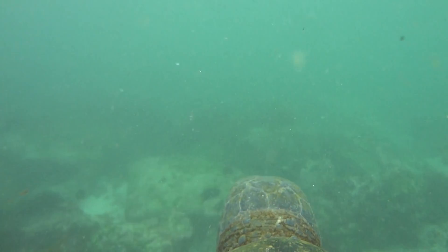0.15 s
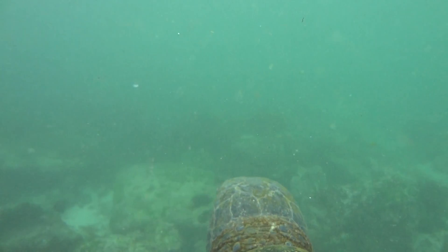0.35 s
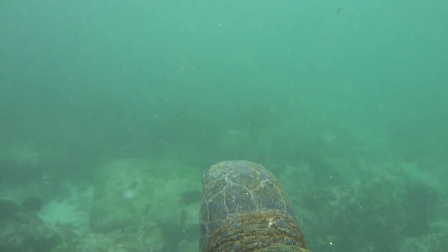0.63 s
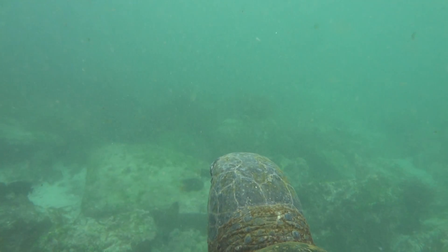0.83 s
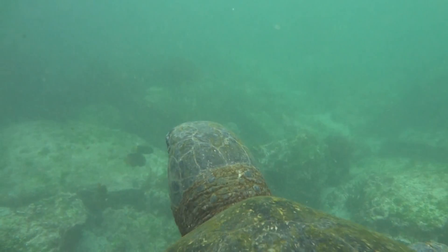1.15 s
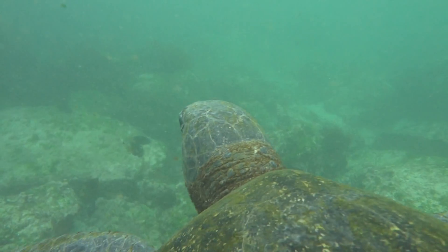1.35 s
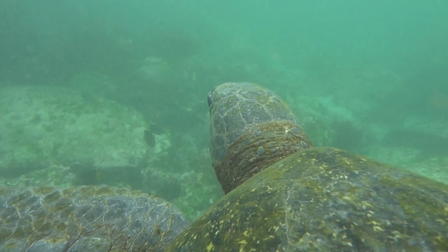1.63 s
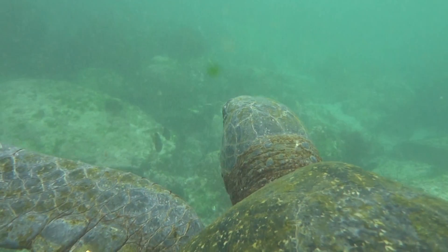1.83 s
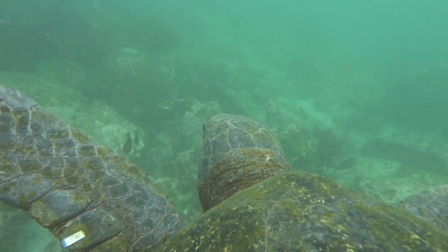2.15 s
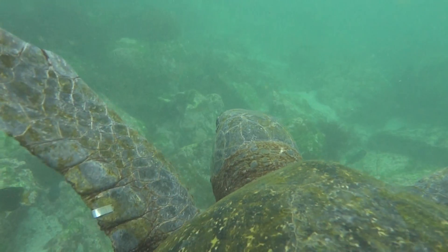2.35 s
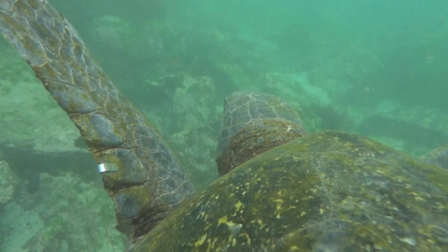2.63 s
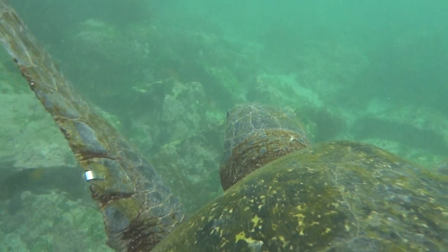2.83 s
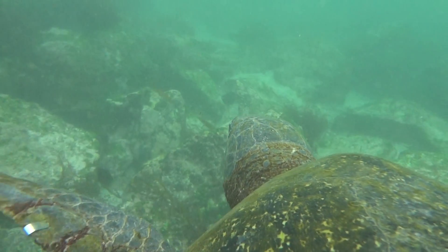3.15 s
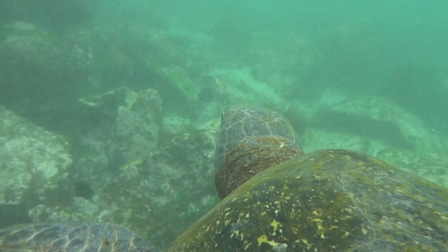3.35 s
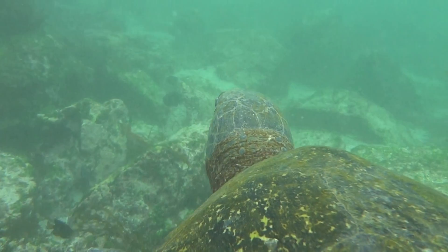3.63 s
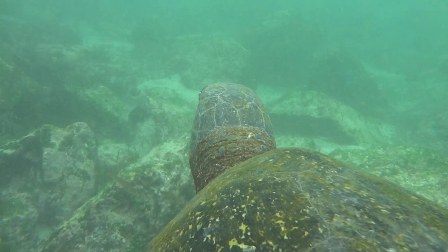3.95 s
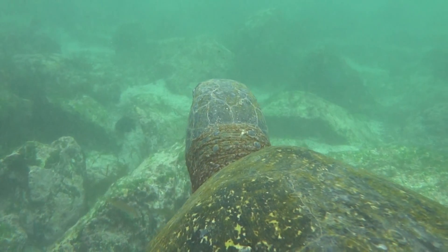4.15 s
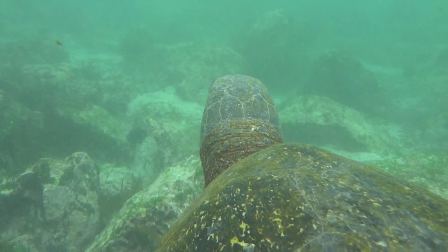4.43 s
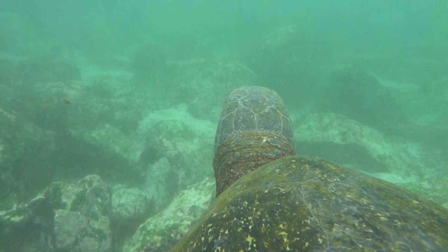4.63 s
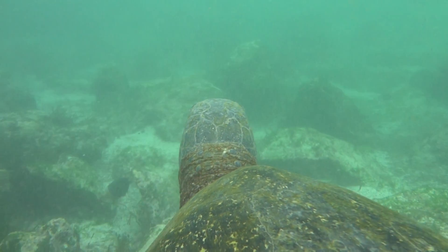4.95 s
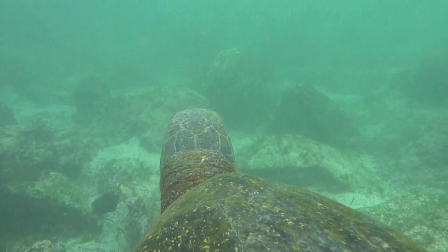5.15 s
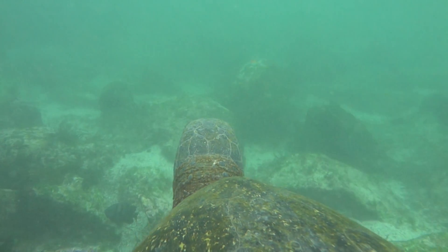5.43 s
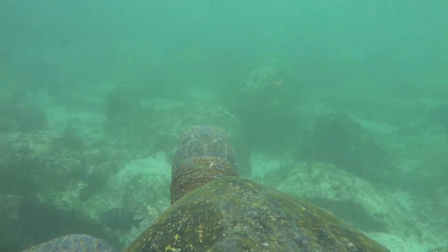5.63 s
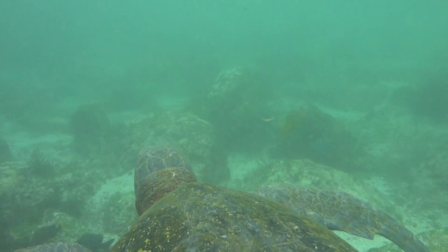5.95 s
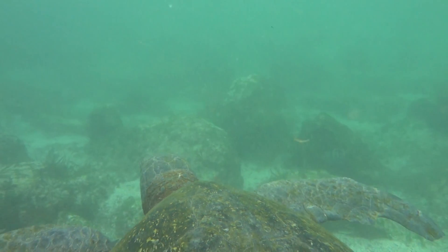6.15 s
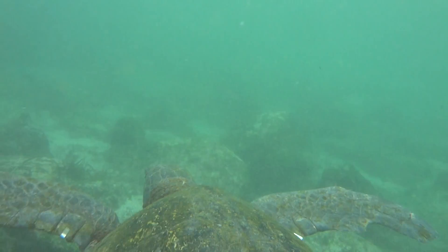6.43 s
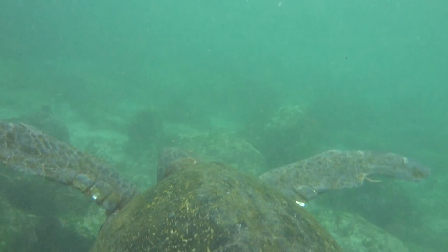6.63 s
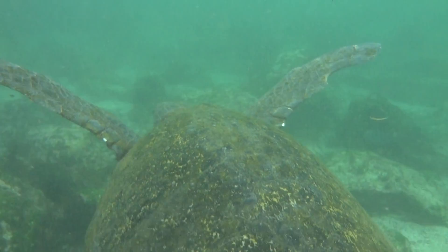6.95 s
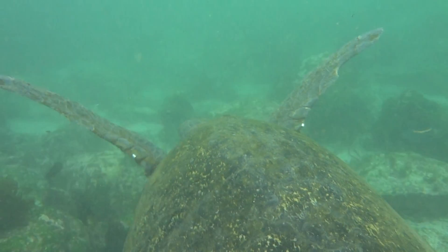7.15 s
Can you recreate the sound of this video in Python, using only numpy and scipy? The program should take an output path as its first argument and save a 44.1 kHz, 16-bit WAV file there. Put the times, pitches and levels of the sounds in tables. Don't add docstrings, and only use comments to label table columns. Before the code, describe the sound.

Underwater over a rocky reef, a sealed camera follows a swimming turtle. From 0 s a calm bed of low rumble and slosh carries continuous fine shrimp crackle, with sharp irregular snaps close by and brief bubble pings; small air pockets gulp in the first second. Around 1.4 s water surges past, deeper and fizzier, with dull thuds on the case. At about 2.2 s the loudest gulp, a low wavering tone that sinks slightly then glides upward, makes the crackle duck and recover. The flow calms after 2.6 s; hard knocks land near 2.8 s, another gulp rises at 3 s, and thuds cluster from 3.8 to 4.6 s and near 5.4 s. Snaps continue, some strong around 5.8 and 6.1 s. Rumble gradually swells, and low gulps at 6.9 to 7.1 s lead into a heavy closing surge. The plastic shell colours everything boxy, in narrow stereo with a very faint high whine.

```python
import sys
import numpy as np
from scipy import signal
from scipy.fft import rfft, irfft
from scipy.io import wavfile
from scipy.ndimage import uniform_filter1d

SR = 44100
rng = np.random.default_rng(int(sys.argv[2]) if len(sys.argv) > 2 else 0)


def to_wav(s):
    ch = np.atleast_2d(s).T
    pcm = np.round(np.clip(ch, -1, 1) * 32767)
    wavfile.write(sys.argv[1], SR, pcm.astype(np.int16))


def nominal_scale(level):
    x = np.asarray(level, float) / 20
    return 10 ** x


N = 321930


def evened(x):
    return x / np.sqrt(np.mean(x ** 2) + 1e-20)


def read(points, hz):
    point_hz, value = np.transpose(points)
    return np.interp(np.log(hz + 1), np.log(point_hz + 1), value)


def add(mix, start_s, sound):
    part = mix[..., max(round(start_s * SR), 0):][..., :sound.shape[-1]]
    part += sound[..., :part.shape[-1]]


def flow(column):
    # start_s, rumble_db, slosh_db, fizz_db, far_crackle_db, bass_left_right_db
    flow_rows = [
        (0.0, -35, -36, -46, -49.5, -2.5),
        (1.36, -24, -33, -38.5, -49, -6.5),
        (2.58, -36.5, -34.5, -49, -52, -2.5),
        (5.59, -31.5, -38, -50.5, -50, -2.5),
        (7.3, -21.5, -34.5, -48.5, -50, -7.5),
    ]
    names = ["start_s", "rumble_db", "slosh_db", "fizz_db", "far_crackle_db", "bass_left_right_db"]
    rows = np.array(flow_rows)
    return np.interp(np.arange(N) / SR, rows[:, 0], rows[:, names.index(column)])


def lumpy(spectrum, lump_db, lump_s):
    hz = np.fft.rfftfreq(N, 1 / SR)
    white = rng.standard_normal((2, N))
    noise = irfft(rfft(white) * nominal_scale(read(spectrum, hz)), N)
    lumps = rfft(rng.standard_normal(N)) * np.exp(-(hz * lump_s) ** 2)
    swell_db = lump_db * evened(irfft(lumps, N))
    return evened(noise * nominal_scale(swell_db))


def grains(per_s, spread_db, tail_s, hiss):
    size_db = spread_db * np.minimum(rng.exponential(1, N), 3.5)
    size = nominal_scale(size_db) * (rng.random(N) < per_s / SR)
    power = signal.lfilter([1], [1, -np.exp(-1 / (tail_s * SR))], size ** 2)
    return evened(np.sqrt(power / power.mean() + hiss) * rng.standard_normal((2, N)))


def shell(x, lo_hz, hi_hz):
    # pitch_hz, width_hz, level_db
    modes = [(974, 580, 2), (1218, 680, -2.5), (1650, 307, 1), (2317, 870, -7.5), (3380, 930, -3),
             (3720, 330, -2.5), (4650, 600, -15), (5800, 690, -18), (7080, 1870, -16),
             (8510, 183, -9.5), (8915, 1560, -16),
             (10400, 450, -23), (11400, 700, -24), (12250, 400, -26), (13900, 900, -33),
                 (14750, 600, -17), (15550, 450, -22)]
    hz = abs(np.fft.fftfreq(4096, 1 / SR))
    power = 0
    for pitch_hz, width_hz, level_db in modes:
        power = power + nominal_scale(2 * level_db) / (1 + (2 * (hz - pitch_hz) / width_hz) ** 2) ** 2
    power = power / (1 + (lo_hz / (hz + 1)) ** 8) / (1 + (hz / hi_hz) ** 8)
    log_gain = np.log(power + 1e-10) / 2
    phase = -signal.hilbert(log_gain).imag
    ring = np.fft.ifft(np.exp(log_gain + 1j * phase)).real[:2048]
    return signal.oaconvolve(x, ring[None] / np.linalg.norm(ring), axes=1)[:, :N]


def whine():
    # pitch_hz, level_db
    tones = [(15625, -72)]
    t = np.arange(N) / SR
    return sum(np.sqrt(2) * nominal_scale(level_db) * np.sin(2 * np.pi * hz * t) for hz, level_db in tones)


def water():
    # pitch_hz, density_db (per Hz)
    rumble_curve = [(2, -17.5), (4, -1.5), (21, 10), (50, -2.5), (80, -7), (150, -52), (300, -120)]
    # pitch_hz, density_db (per Hz)
    slosh_curve = [(29, -5), (50, -2), (136, -3), (339, -16.5), (539, -21), (800, -29.5), (1040, -57),
                   (1760, -120)]
    rumble = nominal_scale(flow("rumble_db")) * lumpy(rumble_curve, lump_db=3.3, lump_s=.15)
    slosh = nominal_scale(flow("slosh_db") + 2.5) * lumpy(slosh_curve, lump_db=2.4, lump_s=.03)
    return rumble + slosh


def crackle():
    fizz = shell(grains(per_s=170, spread_db=10.5, tail_s=0.0071, hiss=0.31), 550, 2220)
    far = shell(grains(per_s=220, spread_db=5.0, tail_s=0.0015, hiss=0.22), 2920, 4350)
    fine = nominal_scale(-2.5) * shell(grains(per_s=260, spread_db=7.0, tail_s=0.0021, hiss=0.4), 6030, SR / 2)
    duck_s, duck_db, recover_s = 2.222, -13, .25
    since_s = np.arange(N) / SR - duck_s
    dip = nominal_scale(duck_db * np.exp(-abs(since_s) / recover_s) * (since_s > 0))
    return dip * (nominal_scale(flow("fizz_db") + 3.5) * fizz + nominal_scale(flow("far_crackle_db") - 2.0) * (far + fine))


def snaps():
    # start_s, low_db, middle_db, high_db
    snap_rows = [(0.1029, -52, -35, -40), (0.1237, -56, -56, -40), (0.1529, -24.5, -29, -38),
                 (0.182, -42, -32, -50), (0.3025, -15.5, -30.5, -32), (0.3438, -20, -20.5, -30),
                 (0.4458, -58, -32, -48), (0.4907, -55, -43, -57), (0.55, -22.5, -18, -28),
                 (0.696, -54, -24.5, -43), (0.8073, -38, -25.5, -24.5), (0.849, -47, -44, -34),
                 (0.9858, -17, -26.5, -28), (1.001, -21, -25.5, -31.5), (1.22, -19, -39, -49),
                 (1.3718, -25.5, -28, -34), (1.4024, -28, -20, -41), (1.4426, -32, -30, -33),
                 (1.5198, -46, -36, -40), (1.551, -26.5, -19.5, -32.5), (1.5936, -30, -40, -36),
                 (1.6196, -41, -57, -41), (1.7572, -28, -32, -38), (1.7754, -36, -33, -35.5),
                 (1.7966, -36, -27, -37), (1.8307, -44, -35, -38), (1.978, -39, -24, -32),
                 (2.0279, -24, -26, -37.5), (2.096, -30, -26.5, -33.5), (2.1876, -12, -30.5, -32),
                 (2.3936, -22.5, -27.5, -38), (2.526, -37, -56, -51), (2.5466, -31, -34, -49),
                 (2.6831, -25, -40, -48), (2.7003, -28, -30.5, -40), (2.7833, -25.5, -34, -44),
                 (2.817, -75, -42, -41.5), (2.8522, -35, -53, -62), (2.8827, -58, -34.5, -38),
                 (2.984, -37, -47, -46.5), (3.0738, -30, -40, -42), (3.15, -27.5, -28.5, -38),
                 (3.1817, -18, -32.5, -41.5), (3.2143, -31, -51, -47), (3.275, -45, -57, -34.5),
                 (3.341, -29.5, -42, -44), (3.4099, -34, -45, -48), (3.4407, -35, -43, -43),
                 (3.4834, -47.5, -46, -45), (3.6291, -63, -62, -51), (3.7059, -51, -31, -37),
                 (3.779, -34, -33, -48), (3.8555, -39, -32, -53), (4.0723, -28, -38, -34),
                 (4.111, -27, -27.5, -32), (4.125, -36, -28, -32), (4.2084, -30.5, -51, -51),
                 (4.255, -49, -52, -32), (4.33, -17, -36, -36), (4.396, -35, -28.5, -52),
                 (4.5095, -43, -46, -34.5), (4.5473, -57, -43, -40), (4.658, -25, -29.5, -62),
                 (4.7587, -20, -31, -39), (4.7796, -50, -22, -24), (4.891, -32, -29, -34.5),
                 (4.9058, -30.5, -26, -41), (5.096, -31.5, -35, -51), (5.1325, -40, -54, -42),
                 (5.1518, -34, -56, -46), (5.2307, -37, -37, -32.5), (5.305, -28, -29, -40),
                 (5.367, -22, -36.5, -40), (5.418, -24.5, -27.5, -32), (5.4553, -56, -52, -38),
                 (5.4761, -54, -33.5, -43), (5.513, -27.5, -38, -52), (5.5443, -20.5, -36, -40),
                 (5.576, -31, -35, -45), (5.651, -30.5, -51, -46), (5.7431, -22.5, -26.5, -33.5),
                 (5.7987, -13, -24, -27.5), (5.8364, -28, -42, -42), (5.8609, -45, -30, -46),
                 (5.934, -36.5, -50, -38), (6.0012, -28.5, -50, -49), (6.0837, -18.5, -22, -30),
                 (6.105, -47, -41.5, -42.5), (6.157, -41, -30.5, -40), (6.2056, -32.5, -40, -43),
                 (6.296, -31, -50, -55), (6.3637, -41, -35.5, -69), (6.4789, -33, -45, -51),
                 (6.4931, -22, -41, -34.5), (6.589, -47, -48, -33), (6.6207, -33, -24, -44),
                 (6.6662, -27.5, -28, -39), (6.7606, -17.5, -32, -40), (6.8138, -29, -35, -38),
                 (6.8413, -48, -30, -37), (6.8777, -32, -45, -52), (6.9402, -28, -43, -52),
                 (7.0704, -27, -29, -25), (7.1003, -37, -31, -36), (7.1328, -52, -31, -52),
                 (7.2564, -42, -41, -37), (7.2698, -32, -29.5, -39), (7.2966, -27, -33, -46)]
    # low_hz, high_hz, t60_s
    bands = [(630, 1730, 0.036), (2124, 4030, 0.035), (4700, 14000, 0.027)]
    t, out = np.arange(2600) / SR, np.zeros((2, N))
    bursts = rng.standard_normal((len(snap_rows), 3, 2, len(t)))
    bursts[..., 4] = 4.7
    for k, (lo_hz, hi_hz, t60_s) in enumerate(bands):
        shape = nominal_scale(-60 * t / t60_s) + nominal_scale(-22.5 - 60 * t / 0.11)
        train = np.zeros((2, N))
        for row, burst in zip(snap_rows, bursts):
            level_db = row[1 + k] - 3.0
            add(train, row[0] - .0004, nominal_scale(level_db) * shape * burst[k])
        out += shell(train, lo_hz, hi_hz)
    return out


def pings():
    # start_s, peak_db, pitch_hz, t60_s
    ping_rows = [(0.303, -9.5, 1000, 0.053), (0.806, -11, 3790, 0.032), (1.221, -17, 880, 0.051),
                 (2.029, -14, 1784, 0.028), (2.393, -25, 1650, 0.056), (3.183, -7.5, 950, 0.03),
                 (4.329, -22, 1094, 0.046), (4.777, -19, 3810, 0.042), (5.543, -19.5, 1594, 0.055),
                 (6.0, -14, 796, 0.04), (6.506, -15, 890, 0.058), (6.939, -17.5, 1680, 0.031)]
    t, out = np.arange(4000) / SR, np.zeros((2, N))
    for start_s, peak_db, hz, t60_s in ping_rows:
        decay_db = -60 * t / np.clip(t60_s, .01, .1)
        shape = (1 - np.exp(-t / 0.00033)) * nominal_scale(peak_db - 5.5 + decay_db)
        add(out[0], start_s, shape * np.sin(2 * np.pi * hz * t * (1 + 3.9 * t)))
    return out


def thumps():
    # start_s, peak_db, pitch_hz, t60_s
    knocks = [(0.363, -28, 239, 0.07), (0.491, -27.5, 204, 0.11), (0.548, -15, 137, 0.042),
              (0.685, -28, 290, 0.078), (0.927, -29, 99, 0.03), (1.307, -25, 127.3, 0.2),
              (1.327, -13, 124, 0.07), (1.404, -20.5, 108, 0.2), (1.692, -22.5, 79, 0.05),
              (1.801, -22, 108, 0.13), (1.918, -18, 86, 0.044), (1.949, -22.5, 156, 0.041),
              (2.098, -24.5, 138, 0.078), (2.191, -15, 151, 0.058), (2.707, -23.5, 82.6, 0.059),
              (2.785, -10.5, 186, 0.03), (2.852, -9, 189, 0.032), (2.926, -23, 90, 0.09),
              (3.179, -23.5, 148, 0.054), (3.461, -25, 135, 0.1), (3.604, -23, 84, 0.078),
              (3.773, -19, 97, 0.066), (3.811, -19.5, 147, 0.047), (3.876, -12.5, 184, 0.038),
              (4.079, -21.5, 150, 0.061), (4.11, -20.5, 116, 0.051), (4.288, -30, 116, 0.09),
              (4.329, -10, 152, 0.065), (4.423, -17.5, 167, 0.045), (4.484, -11.5, 205, 0.046),
              (4.527, -19.5, 138, 0.04), (4.621, -15.5, 144.6, 0.058), (4.858, -17.5, 112, 0.069),
              (4.918, -28, 100, 0.1), (4.98, -22, 184, 0.053), (5.2, -29.5, 128, 0.062),
              (5.269, -44, 146, 0.061), (5.409, -19, 95.7, 0.03), (5.432, -9.5, 120, 0.08),
              (5.53, -28, 178, 0.11), (5.635, -28.5, 133, 0.13), (5.839, -14, 158, 0.03),
              (6.065, -20.5, 114.6, 0.071), (6.103, -16.5, 105, 0.063), (6.173, -23, 80.7, 0.077),
              (6.256, -14, 75, 0.03), (6.318, -22.5, 114.6, 0.062), (6.505, -28, 134.4, 0.14),
              (6.668, -24, 127, 0.13), (7.194, -33, 73.6, 0.15)]
    t, out = np.arange(6000) / SR, np.zeros(N)
    for start_s, peak_db, hz, t60_s in knocks:
        swell = 1 - np.exp(-(t * hz / 0.55) ** 2)
        shape = swell * nominal_scale(-60 * t / np.clip(t60_s, .02, .3))
        phase = 2 * np.pi * hz * (t + 0.0013 * (1 - np.exp(-t / 0.0019)))
        add(out, start_s + 0.00071, nominal_scale(peak_db + 3.5) * shape / shape.max() * np.sin(phase))
    return out


def gulps():
    # start_s, pitch_hz, level_db
    pockets = [
        [(0, 196, -19), (.02, 174, -21.5), (.04, 172, -41)],
        [(.368, 257, -25), (.4, 249, -29.5), (.44, 280, -43), (.47, 307, -36)],
        [(.625, 288, -49), (.64, 289, -29), (.67, 300, -32), (.69, 310, -20.5)],
        [(.897, 106, -16), (.91, 100.2, -24), (.95, 95.5, -17), (1, 99.5, -20), (1.04, 107, -42),
         (1.1, 115, -33), (1.2, 132.3, -16)],
        [(.96, 170, -32), (1, 174, -27), (1.04, 172, -50)],
        [(2.212, 93.5, -20), (2.23, 92.4, -16.5), (2.29, 95.85, -8.5), (2.34, 102.7, -16), (2.37, 108.7, -11),
         (2.44, 115.7, -13.5), (2.49, 122.2, -21), (2.53, 133, -36)],
        [(2.33, 189, -28.5), (2.36, 172.5, -21.5), (2.41, 170, -28), (2.47, 177, -34)],
        [(2.545, 167.3, -28.5), (2.565, 159, -16), (2.59, 151.7, -23.5), (2.62, 159.2, -23.5), (2.65, 165, -34)],
        [(3.0, 146, -37), (3.02, 154.9, -16.5), (3.065, 163.1, -10), (3.085, 171.1, -27), (3.13, 181, -29),
         (3.17, 201, -29)],
        [(6.895, 116, -38), (6.92, 110, -20), (6.95, 108, -26.5)],
        [(7.053, 105, -29), (7.075, 99, -13.5), (7.095, 98, -38), (7.11, 104.6, -11.5), (7.135, 98, -23),
         (7.145, 95, -27.5)],
    ]
    out = np.zeros(N)
    drift = uniform_filter1d(rng.standard_normal(N), size=600)
    waver = evened(uniform_filter1d(drift, size=600))
    for rows in pockets:
        point_s, pitch_hz, level_db = np.transpose(rows)
        t = np.arange(point_s[0], point_s[-1], 1 / SR)
        shake = 1 + 0.039 * waver[int(point_s[0] * SR):][:len(t)]
        phase = 2 * np.pi * np.cumsum(np.interp(t, point_s, pitch_hz) * shake) / SR
        tone = np.sin(phase) + 0.037 * np.sin(2 * phase)
        level = np.sqrt(2) * nominal_scale(np.interp(t, point_s, level_db))
        add(out, point_s[0], level * tone * signal.windows.tukey(len(t), .08))
    return out


def ports(near, spare):
    # pitch_hz, likeness (0..1)
    likeness = [(60, 0.82), (400, 0.92), (1300, 0.85), (4400, 0.79), (15000, 1)]
    # pitch_hz, lead_rad
    left_lead = [(20, .4), (520, 1.02), (1810, 0.53), (2330, -1.3), (3100, 0.3), (5400, 0.32),
                 (12000, 0.29)]
    # pitch_hz, balance_db
    balance = [(60, -2), (180, -2.5), (550, -0.5), (1650, -3.5), (4970, 1), (15000, -3)]
    hz = np.fft.rfftfreq(N, 1 / SR)
    same = np.sqrt(np.clip(read(likeness, hz), 0, 1))
    tilt = nominal_scale(read(balance, hz) / 2) * np.exp(.5j * read(left_lead, hz))
    shared = same * rfft(near)
    unshared = np.sqrt(1 - same ** 2) * rfft(spare) / np.sqrt(2)
    return irfft(np.array([(shared + unshared) * tilt, (shared - unshared) / tilt]), N)


def scene():
    low = water()
    low[0] += gulps() + thumps()
    lean = nominal_scale(np.outer([.5, -.5], flow("bass_left_right_db") + 3))
    bass = lean * ports(*low) * nominal_scale(2.1)
    treble = ports(*(crackle() + snaps() + pings()))
    return bass + treble + whine()


def low_pass(x):
    return signal.sosfilt(signal.butter(12, 16960, fs=SR, output="sos"), x)


def record(dry):
    limited = np.tanh(dry / 0.91) * 0.89
    edge = signal.firwin(201, 16200, window=("kaiser", 9), fs=SR)
    mix = signal.oaconvolve(limited, edge[None], "same")
    return low_pass(mix)


dry = scene()
out = record(dry)
to_wav(out)
```